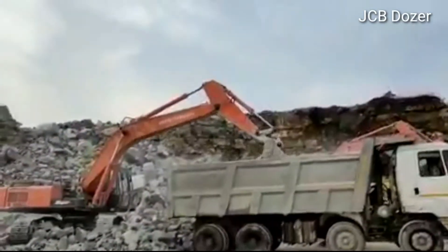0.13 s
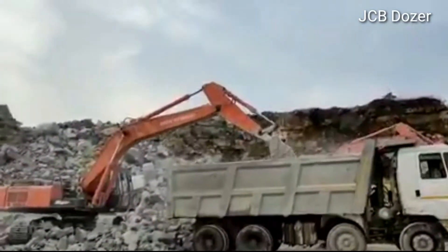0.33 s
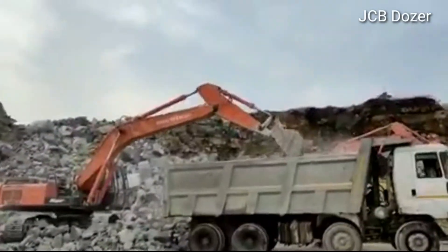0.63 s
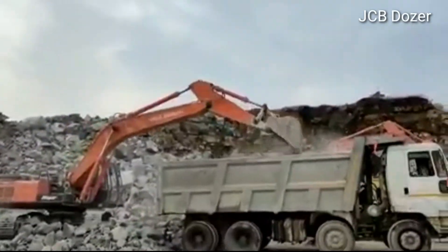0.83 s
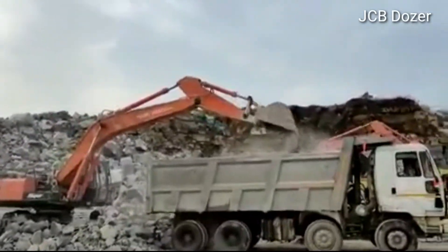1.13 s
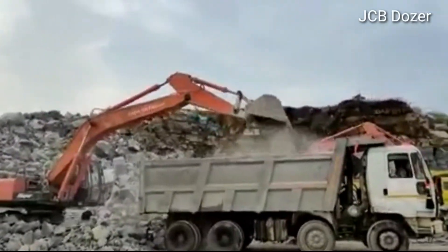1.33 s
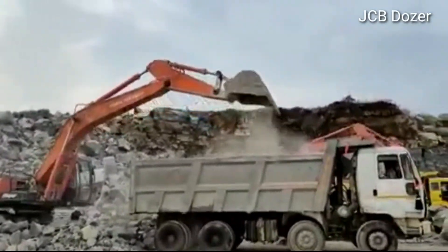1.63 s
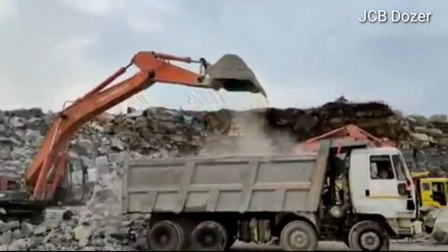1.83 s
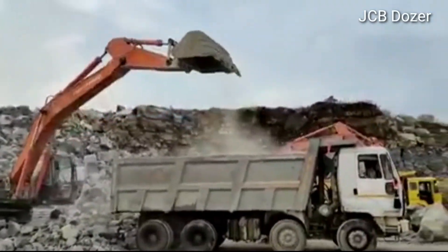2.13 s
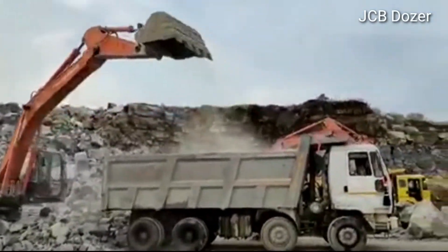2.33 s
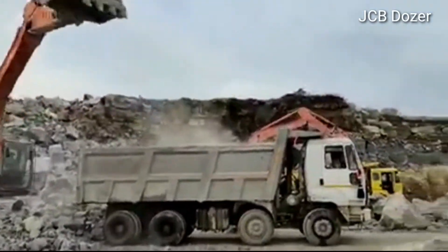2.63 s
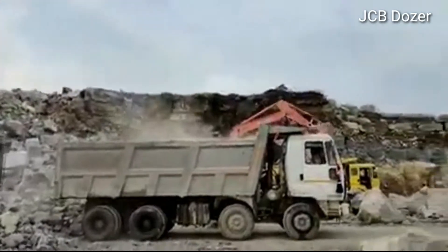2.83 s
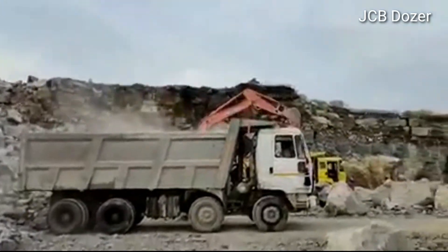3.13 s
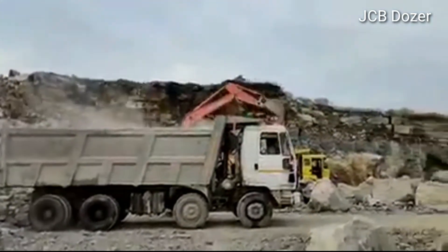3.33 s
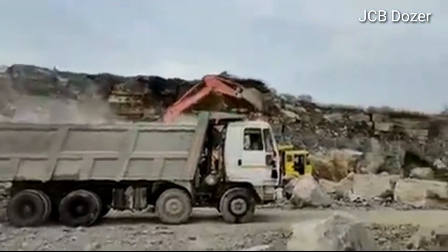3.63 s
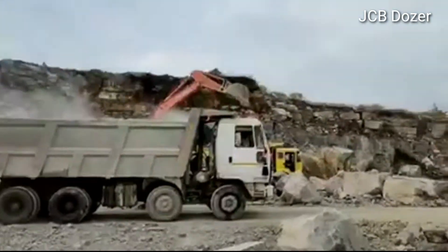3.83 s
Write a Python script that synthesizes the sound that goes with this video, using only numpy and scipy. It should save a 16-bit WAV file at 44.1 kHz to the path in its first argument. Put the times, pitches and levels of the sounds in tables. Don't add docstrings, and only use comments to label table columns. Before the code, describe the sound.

Stones and gravel tumble into a metal dump truck bed in a quarry, then thin out

```python
import sys
import numpy as np
from scipy import signal
from scipy.io import wavfile
from scipy.ndimage import uniform_filter1d

SR = 44100
rng = np.random.default_rng(int(sys.argv[2]) if len(sys.argv) > 2 else 0)


def gain_from_db(level_db):
    decades = np.asarray(level_db, float) / 20
    return 10 ** decades


def put_to_file(sound):
    columns = np.atleast_2d(sound).T
    safe = np.clip(columns, -1, 1)
    whole_steps = np.round(safe * 32767)
    wavfile.write(sys.argv[1], SR, whole_steps.astype(np.int16))


N = 176400


def rms_one(x):
    return x / np.sqrt(np.mean(x ** 2) + 1e-20)


def in_time(rows):
    s, *columns = np.transpose(rows)
    return [np.interp(np.arange(N) / SR, s, c) for c in columns]


def at_hz(points, hz):
    table_hz, values = np.transpose(points)
    return np.interp(np.log(hz), np.log(table_hz), values)


def drift(rate_hz):
    r = np.exp(-80 * np.pi * rate_hz / SR)
    noise = rng.standard_normal(N // 40 + 2002)
    slow = signal.lfilter([1], [1, -2 * r, r * r], noise)[2000:]
    return np.interp(np.arange(N) / 40, np.arange(len(slow)), rms_one(slow))


def bandpass(x, low_hz, high_hz, order):
    return signal.sosfilt(signal.butter(order, [low_hz, high_hz], "band", fs=SR, output="sos"), x)


def ring(clicks, hz, t60_s):
    r = np.exp(-np.log(1000) / (t60_s * SR))
    w = 2 * np.pi * hz / SR
    return signal.lfilter([0, np.sin(w)], [1, -2 * r * np.cos(w), r * r], clicks + 1e-18)


def bursts(start_s, db, rise_s, fall_s):
    marks = np.zeros(N)
    np.add.at(marks, (np.asarray(start_s) * SR).astype(int), gain_from_db(db) ** 2)
    t = np.arange(SR // 2) / SR
    shape = (1 - np.exp(-t / rise_s)) ** 2 * np.exp(-2 * t / fall_s)
    return np.abs(signal.fftconvolve(marks, shape / shape.max())[:N])


def pair(hz):
    # pitch_hz, left_right_likeness (-1 to 1)
    likeness = [(40, 0.98), (130, 1), (320, 1), (600, 0.85), (1100, 0.82), (2000, -0.3), (5000, 0.019)]
    # pitch_hz, left_minus_right_db
    left_lean = [(300, -0.5), (1200, -0.5), (2500, -4), (4300, 5), (6500, 12), (8300, 1)]
    alike = np.clip(at_hz(likeness, hz), -.996, .996)
    lean_db = at_hz(left_lean, hz) / 2
    mid_side = np.sqrt([1 + alike, 1 - alike]) * [[1, 1.0], [1, -1.256]]
    return mid_side * gain_from_db(np.array([[lean_db], [-lean_db]]))


def grains(per_s, spread_db, size):
    sizes = gain_from_db(spread_db * np.minimum(rng.exponential(1, size), 5)) * rng.choice([-1, 1], size)
    return sizes * (rng.random(size) < per_s / SR)


def banded(white, spectrum, low_hz, per_octave, count, patchy_db):
    late, late_s = 0.12, .0004
    edges = low_hz * 2 ** (np.arange(count + 1) / per_octave)
    delay = int(late_s * SR)
    white = [[mid, late * np.roll(mid, delay) + np.sqrt(1 - late ** 2) * side] for mid, side in white]
    out = 0
    for k, (low, high) in enumerate(zip(edges, edges[1:])):
        hz = np.sqrt(low * high)
        band = bandpass(white[k % 2], low, high, 2)
        out = out + gain_from_db(at_hz(spectrum, hz) + patchy_db * drift(2.8)) * (pair(hz) @ band)
    return rms_one(out)


def distant_site():
    # pitch_hz, level_db
    site_colour = [(30, -28), (70, 15), (110, -7), (250, 2.5), (400, -12), (700, -37), (1300, -5),
                   (2050, -36.5), (4100, -19.5), (8000, -43.5)]
    noise = rng.standard_normal((2, 2, N))
    return gain_from_db(-60.5) * banded(noise, site_colour, 35.9, per_octave=2, count=15, patchy_db=4.0)


def diesel():
    # firing_multiple, level_db
    orders = [
        (1.999, -62),
        (2.33, -84.5),
    ]
    firing_hz = 50.7
    turn = 2 * np.pi * np.cumsum(firing_hz * (1 + 0.009 * drift(1.3))) / SR
    return sum(np.sqrt(2) * gain_from_db(db + 0.77 * drift(11.0)) * np.sin(k * turn) for k, db in orders)


def hydraulic_pump():
    # start_s, pitch_hz, level_db, second_partial_db
    whine = [
        (1.9, 570, -91, -83),
        (2.17, 605, -47, -54),
        (2.3, 618, -50.5, -49.5),
        (2.43, 633.6, -46, -61.5),
        (2.53, 607, -78, -66),
        (2.74, 604, -75, -49.5),
        (2.8, 600, -97, -95),
    ]
    hz, db, second_db = in_time(whine)
    spin = 2 * np.pi * np.cumsum(hz * (1 + .036 * drift(60.2))) / SR
    first = gain_from_db(db + 3 * drift(20.0)) * np.sin(spin)
    second = gain_from_db(second_db + 4 * drift(25.0)) * np.sin(2 * spin)
    return np.sqrt(2) * (first + second)


def gravel():
    # start_s, flow_db, finest_dust_db
    stream = [(0, -39, -4), (.28, -52.5, 9), (.8, -43.5, -1), (1.1, -47.5, 3), (1.36, -46.5, 5),
              (1.95, -47, 1), (2.2, -54, 0), (2.3, -51, -9), (2.45, -47.5, 1.5), (2.8, -51, -2.5),
              (2.95, -55.5, -5.5), (3.3, -61, -8), (3.48, -60.5, -2), (3.6, -56, -11.5), (4, -56.5, -10.5)]
    # start_s, peak_db, finest_dust_db
    splashes = [(0.0563, -27, 7.5), (0.345, -21.5, -13), (0.442, -26.5, -1), (0.539, -28, -1),
                (0.603, -41, 13.5), (0.762, -28, 6), (0.8030, -21, -5.5), (0.9497, -51, -8),
                (1.1189, -42.5, 10), (1.2835, -32, -8), (0.831, -21.5, -1), (1.3389, -26.5, -1),
                (1.4192, -37.5, 7), (1.5933, -33, 4.5), (1.6566, -46, 13.5), (1.8213, -26, 2),
                (1.892, -26, -1.5), (1.9485, -28.5, 7), (1.9979, -29, 1), (2.3087, -48.5, 12),
                (2.365, -47.5, 13), (2.4711, -44.5, 11.5), (2.614, -33.5, 0), (2.6793, -38.5, 3.5),
                (2.787, -36.5, 2.5), (3.4720, -52, 7.5), (3.761, -33.5, -14), (3.822, -31.5, -27)]
    # pitch_hz, level_db (per Hz)
    colour = [(1000, -30), (1700, 5), (2070, 1.5), (2310, 3.5), (4540, 0.5), (5980, -8.5), (7620, 8),
              (8720, 0.5), (9300, -35.5), (12100, -67.5), (20500, -120)]
    rise_s, fall_s, dust_hz = .005, 0.033, 5400
    flow_db, fine_db = in_time(stream)
    start_s, peak_db, dust_db = np.transpose(splashes)
    flow_db = flow_db + 1.5 * drift(35.0)
    peak_db = peak_db - 11
    clicks = grains(6000.0, 1, size=(2, 2, N))
    hiss = banded(clicks, colour, 1800, per_octave=3, count=8, patchy_db=1.0)
    out = 0
    for stream_db, splash_db, kind in [(0, 0, "low"), (fine_db, dust_db, "high")]:
        landing = bursts(start_s - rise_s, peak_db + splash_db, rise_s, fall_s)
        level = np.sqrt(gain_from_db(flow_db + stream_db) ** 2 + landing)
        part = signal.sosfilt(signal.butter(4, dust_hz, kind, fs=SR, output="sos"), hiss)
        out = out + level * part
    return out


def panels_and_thuds():
    # start_s, pitch_hz, level_db, t60_s
    rings = [(.33, 1001, -40, .5), (.78, 906, -35, .2), (1.59, 1341, -38, .3), (3.835, 1010, -41, 1.6),
             (3.85, 1065, -47, 1.0), (.985, 147, -32, .3), (.99, 105, -35, .3), (1.46, 252, -31, .7),
             (1.89, 252, -28, .35), (1.74, 27.5, -34, .5), (.98, 28.5, -43, .3), (3.75, 950, -44, .3),
             (1.72, 148, -27, .5), (2.78, 181, -37, .2), (.001, 935, -36, .5), (3.07, 1290, -55, .6)]
    out = np.zeros(N)
    rattle = gain_from_db(4.0 * drift(40.0))
    for s, hz, db, t60_s in rings:
        span = slice(int(s * SR), min(int((s + t60_s) * SR), N))
        t = np.arange(span.stop - span.start) / SR
        both = np.sin(2 * np.pi * hz * t) + .6 * np.sin(2 * np.pi * hz * 1.017 * t)
        soft_start = np.clip(t / .025, 0, 1)
        shake = rattle[span] if hz > 500 else 1
        out[span] += gain_from_db(db - 60 * t / t60_s) * both * soft_start * shake
    return out


def struck_modes(rows, rise_s, t60_s, trim_db):
    out = np.zeros(N + SR)
    t = np.arange(SR // 4) / SR
    shape = (1 - np.exp(-t / rise_s)) ** 2 * gain_from_db(-60 * t / t60_s)
    for (s, db, hz), (up, down) in zip(rows, rng.uniform(.04, .16, (len(rows), 2))):
        modes = [(.65, 1), (.25, 1 + up), (.25, 1 - down)]
        tone = sum(g * np.sin(2 * np.pi * hz * k * t) for g, k in modes)
        i = int(s * SR)
        out[i:i + len(t)] += gain_from_db(db + trim_db) * tone * shape / shape.max()
    return out[:N]


def single_stones():
    # start_s, peak_db, pitch_hz
    thumps = [(0.094, -27, 411), (0.167, -25, 335), (0.346, -11.5, 337), (0.442, -17.5, 336.3),
              (0.594, -20, 344), (0.705, -21, 340), (0.756, -14.5, 347), (0.787, -18, 322),
              (0.828, -14.5, 325.4), (0.919, -21.5, 304.5), (1.016, -29.5, 300), (1.136, -24.5, 349),
              (1.238, -23, 324), (1.472, -25.5, 421), (1.575, -15, 318.5), (1.714, -16, 393),
              (1.806, -17.5, 240), (1.875, -18.5, 262.7), (2.086, -31, 315), (2.433, -40, 384),
              (2.501, -29.5, 314.3), (2.673, -32, 321), (2.759, -28.5, 325.7), (2.794, -24.5, 273.5),
              (2.868, -40, 364), (3.204, -32, 333), (3.348, -38.5, 375.3), (3.409, -35.5, 382),
              (3.589, -33, 342), (3.623, -39, 385), (3.665, -26, 321), (3.794, -26.5, 307),
              (3.84, -15.5, 330)]
    # start_s, peak_db, pitch_hz
    clangs = [(0.358, -18.5, 1019), (0.412, -20.5, 1006), (0.541, -27.5, 1287), (0.64, -22.5, 1005),
              (0.707, -26.5, 845), (0.744, -18.5, 1026), (0.785, -13.5, 869), (0.84, -19.5, 1390),
              (1.262, -33, 1210), (1.323, -29, 1145), (1.438, -25.5, 1132), (1.51, -29, 1000),
              (1.599, -23.5, 1349), (1.827, -20, 890), (1.896, -22.5, 898), (2.15, -41.5, 1083),
              (3.503, -44.5, 1050)]
    thump = struck_modes(thumps, rise_s=0.0037, t60_s=0.1, trim_db=0.5)
    return thump + struck_modes(clangs, rise_s=0.0005, t60_s=0.12, trim_db=-2.5)


def truck_bed():
    # start_s, level_db, bare_plate_share_db, side_wall_share_db
    tumble = [(0, -32.5, -3.5, -4.5), (.28, -39, -9.5, -0.5), (.38, -31.5, -7, -3.5), (.7, -37.5, 1.5, 1.5),
              (1.22, -38, -6, -4), (1.5, -34.5, -4.5, -2.5), (1.95, -30.5, -9, -4),
              (2.19, -53.5, -0.5, 6.5), (2.33, -57, -2, 8), (2.48, -37, -20, -7), (2.64, -62.5, 16, 6),
              (2.7, -39, -13.5, -15), (3.0, -43, -29, -13), (3.1, -68, 7, -5), (3.22, -46.5, -25, -29),
              (3.52, -46, -29, -14), (3.62, -38, -21.5, -17), (4, -47.5, -32, -13)]
    # start_s, peak_db, deep_thud_db, plate_clang_db
    blocks = [(0.33, -20, -38.5, -2.5), (0.442, -16.5, -11.5, -8), (0.546, -22, -46, -15),
              (0.747, -28.5, -35.5, 2), (0.789, -27, -47.5, 4.5), (0.83, -11.5, -13.5, -8),
              (0.989, -18, -5.5, -12), (1.346, -35.5, 2, 8.5), (1.572, -13.5, -10.5, -17),
              (1.71, -16.5, -1, -48), (1.76, -16, 2.5, -38), (1.808, -19, 2, -2.5),
              (1.898, -11.5, -7.5, -21), (1.937, -13.5, -50, -9.5), (2.431, -22, -25, -15),
              (2.549, -34, -14, -1), (2.787, -29.5, -5.5, -0.5), (2.868, -34, -23, -25),
              (2.961, -42.5, -12, 0.5), (3.756, -33.5, -16, -6.5), (3.826, -15, -20.5, -17.5)]
    zone_edges = [78, 225, 460, 740, 2100]
    # pitch_hz, level_db (per Hz)
    bed_colour = [(41, -48), (70, -19.5), (139, -18.5), (209, -13.5), (320, 9.5), (758, -9.5), (903, -8.5),
                  (1210, -4), (2300, -27), (2990, -64), (5060, -120)]
    knocks_per_s, rise_s, lead_s = 2200.0, .007, .012
    thud_fall_s, block_fall_s = 0.052, 0.059

    level, bare, wall = in_time(tumble)
    start_s, peak_db, thud, clang = np.transpose(blocks)
    peak_db = peak_db - 10
    zones = [(level - 18, peak_db + thud, thud_fall_s, 7),
             (level, peak_db - 3.5, block_fall_s, 9),
             (level + wall, peak_db + 0.69 * clang - 2.5, block_fall_s, 7),
             (level + bare, peak_db + clang, block_fall_s, 18)]
    knocks = grains(knocks_per_s, 2.2, size=(2, N))
    hit = np.nonzero(knocks)
    out = 0
    for (flow, blow, fall_s, count), low, high in zip(zones, zone_edges, zone_edges[1:]):
        force = np.sqrt(gain_from_db(flow) ** 2 + bursts(start_s - lead_s, blow, rise_s, fall_s))
        pitches = np.geomspace(low * 1.07, high / 1.07, count) * rng.uniform(.98, 1.02, count)
        power = gain_from_db(at_hz(bed_colour, pitches)) ** 2 * pitches
        part = 0
        for hz, share in zip(pitches, power / power.sum()):
            t60_s = 0.051 + 5.8 / hz
            weights = np.resize(rng.standard_normal(9000), len(hit[0]))
            sizes = rms_one(weights * knocks[hit])
            own = np.zeros((2, N))
            own[hit] = sizes * (force * gain_from_db(1.8 * drift(5.5)))[hit[1]]
            gain = np.sqrt(share * 2 * np.log(1000) / (t60_s * knocks_per_s))
            part = part + gain * pair(hz) @ ring(own, hz, t60_s)
        out = out + bandpass(part, low, high, 4)
    return out


def rock_faces(x):
    # delay_s, level_db
    echoes = [
        (0.046, -15),
        (0.085, -13),
        (0.141, -23),
    ]
    dull = signal.sosfilt(signal.butter(1, 2500, fs=SR, output="sos"), x)
    return sum(gain_from_db(db) * np.pad(dull, ((0, 0), (int(s * SR), 0)))[:, :N] for s, db in echoes)


def scene():
    load = truck_bed() + gravel() + single_stones()
    machines = diesel() + hydraulic_pump() + distant_site()
    return load + rock_faces(load) + machines + panels_and_thuds()


def patchy_gain(x):
    # pitch_hz, threshold_db
    drop_below = [(600, -112.5), (1650, -88), (2000, -76), (2400, -88), (5100, -79), (7200, -80),
                  (8300, -70)]
    hz, t, z = signal.stft(x, SR, nperseg=1024)
    power = uniform_filter1d(np.abs(z) ** 2, size=3, axis=1)
    level_db = 10 * np.log10(uniform_filter1d(power, size=5, axis=2) + 1e-16)
    luck = uniform_filter1d(rng.standard_normal((2, 2, 171, len(t))), size=9, axis=3) * 3
    luck = np.repeat(luck, 3, axis=2)
    margin_db = level_db + 7.0 * luck[0] - at_hz(drop_below, hz + 1)[:, None]
    drop_db = -20 / (1 + np.exp(np.clip(margin_db, -30, 30)))
    uneven_db = 3.0 * luck[1] * (hz > 700)[:, None]
    return signal.istft(z * gain_from_db(drop_db + uneven_db), SR, nperseg=1024)[1][:, :N]


def band_limit(x):
    return signal.sosfilt(signal.butter(12, 9710, fs=SR, output="sos"), x)


def record(dry):
    overload = 0.17
    rounded = overload * np.tanh(dry / overload)
    thin = signal.sosfilt(signal.butter(2, 60, "high", fs=SR, output="sos"), rounded)
    top_cut = signal.ellip(12, .3, 75, 9200, fs=SR, output="sos")
    return band_limit(signal.sosfilt(top_cut, patchy_gain(thin)))


dry = scene()
out = record(dry)
put_to_file(out)
```